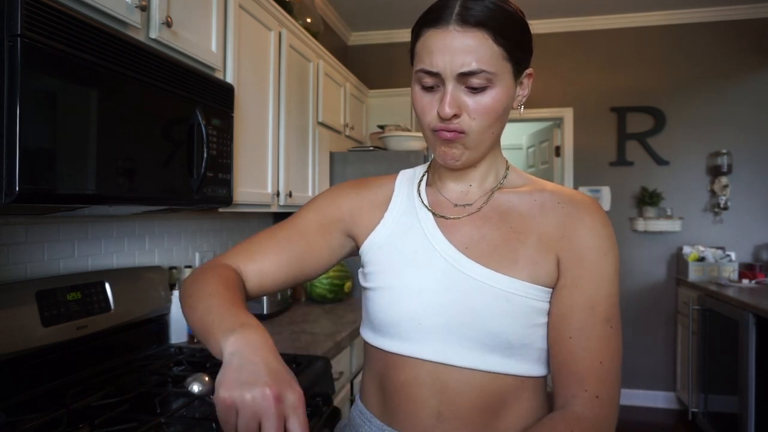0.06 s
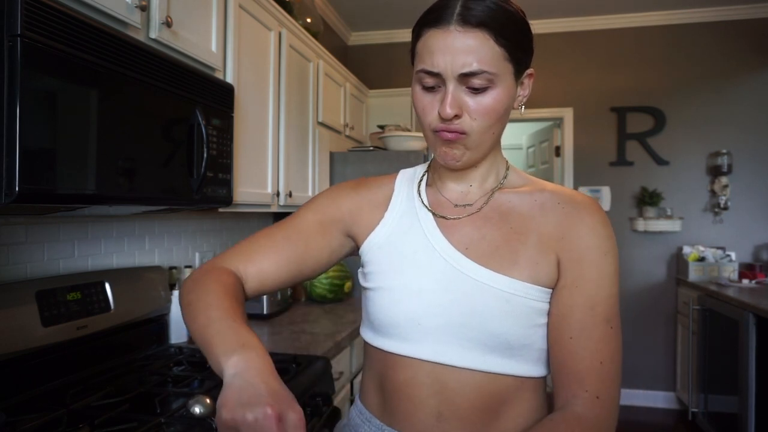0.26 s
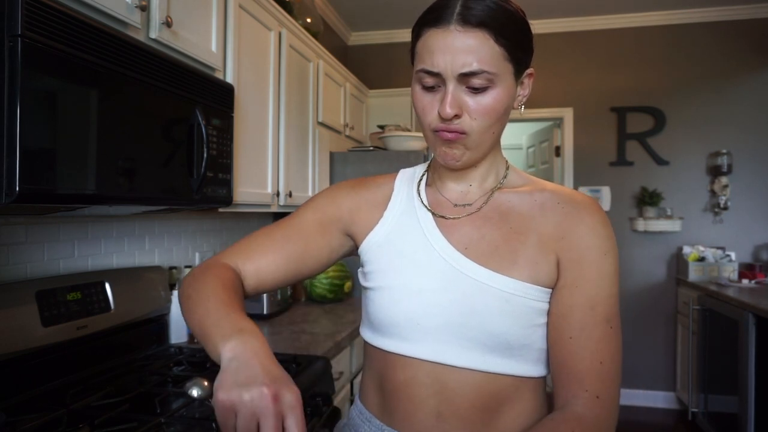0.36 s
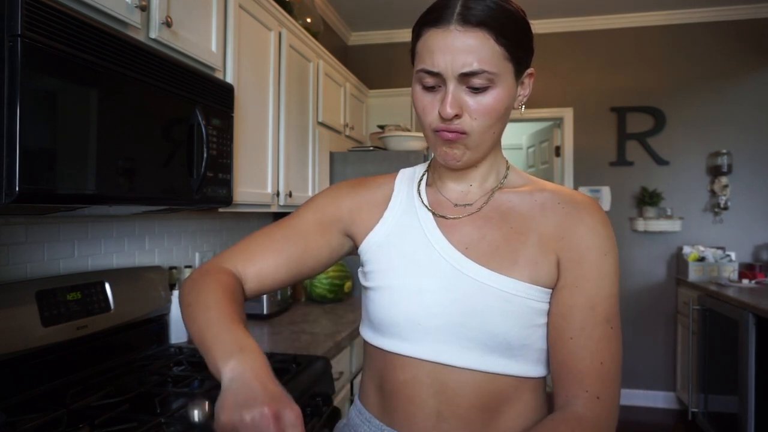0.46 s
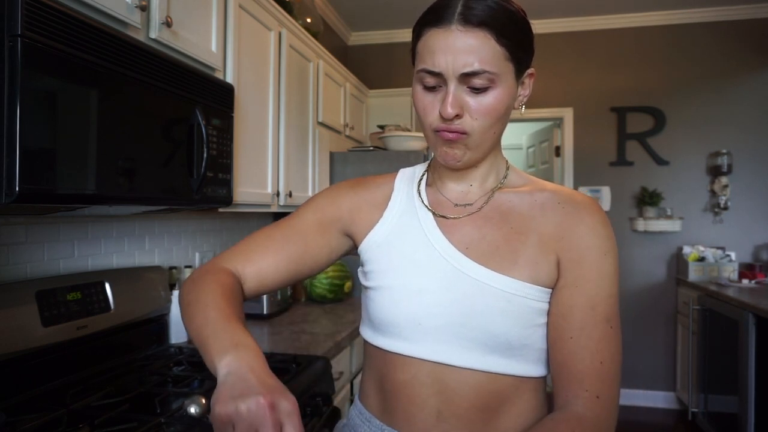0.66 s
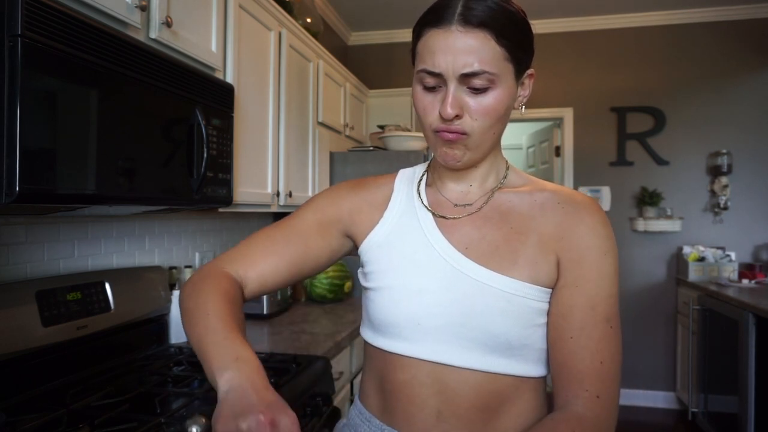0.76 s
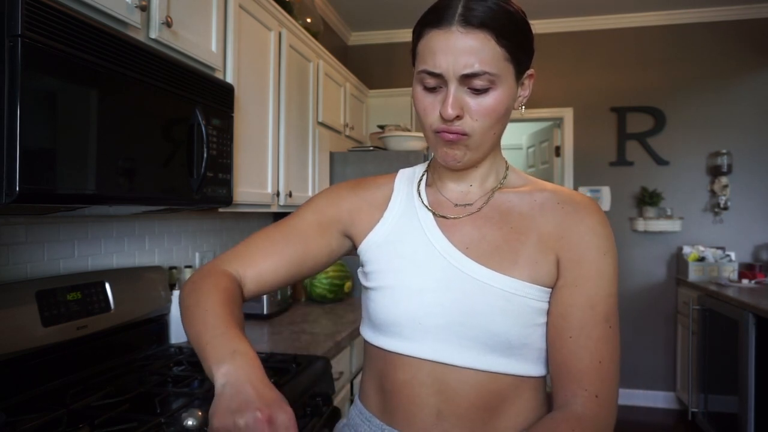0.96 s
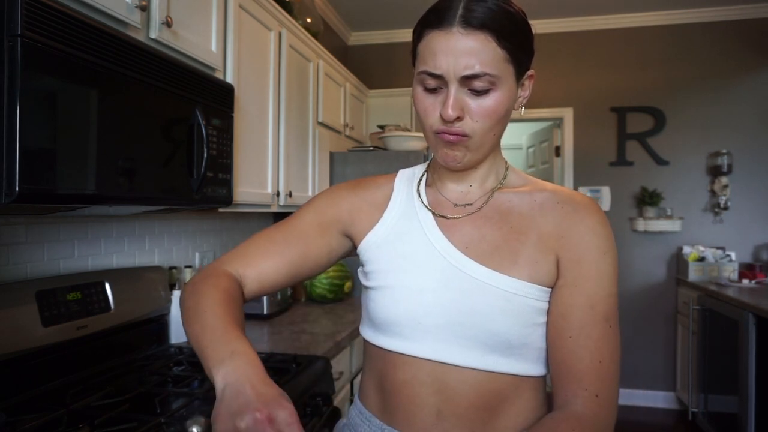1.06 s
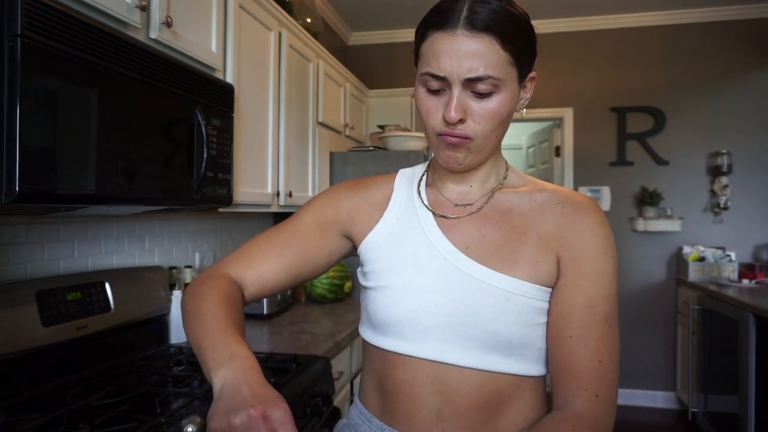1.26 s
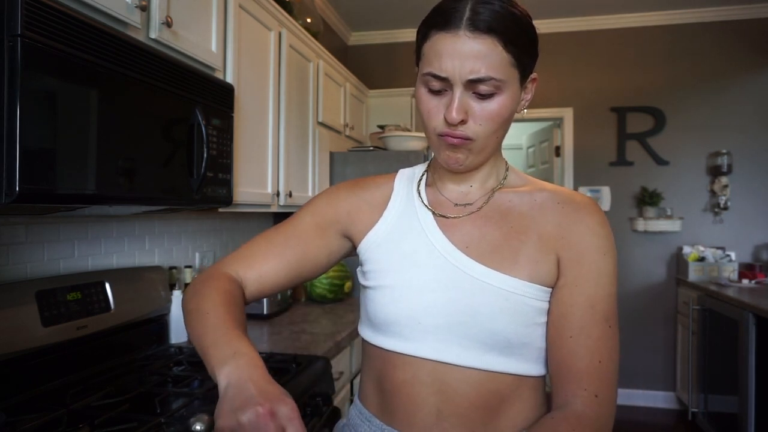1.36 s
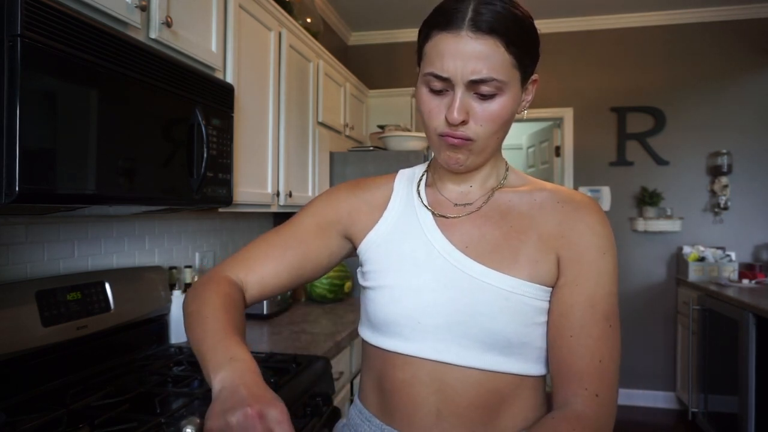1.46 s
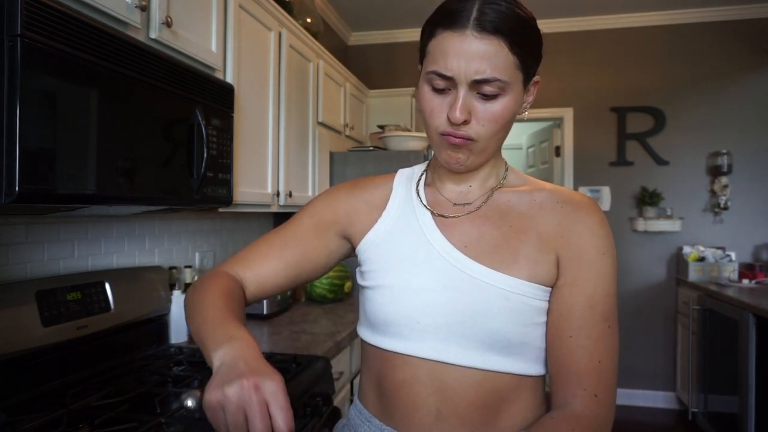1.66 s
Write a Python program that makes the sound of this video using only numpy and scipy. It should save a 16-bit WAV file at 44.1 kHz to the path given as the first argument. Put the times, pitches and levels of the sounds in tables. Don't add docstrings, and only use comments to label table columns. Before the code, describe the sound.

Ice and a metal spoon clatter in a full glass on a counter, in uneven bursts about a quarter second apart, quickening around one second, then thinning out; close microphone, lively kitchen echo, very quiet background.

```python
import sys
import numpy as np
from scipy import signal
from scipy.fft import rfft, irfft, next_fast_len
from scipy.io import wavfile

SR = 44100
rng = np.random.default_rng(int(sys.argv[2]) if len(sys.argv) > 2 else 0)


def elevation(decibels):
    levels = np.asarray(decibels, float)
    return 10 ** (levels / 20)


def store_wav(level_fs):
    pcm = np.round(np.clip(np.atleast_2d(level_fs), -1, 1) * 32767)
    wavfile.write(sys.argv[1], SR, pcm.T.astype(np.int16))


N = 74970


def read(points, hz):
    point_hz, value = np.transpose(points)
    return np.interp(np.log(hz + 1), np.log(point_hz + 1), value)


def add(mix, start_s, sound):
    part = mix[max(round(start_s * SR), 0):][:len(sound)]
    part += sound[:len(part)]


def butter(x, order, cut_hz, kind="low"):
    return signal.sosfilt(signal.butter(order, cut_hz, kind, fs=SR, output="sos"), x)


def ring(modes, rise_s, scale=1, spread=0):
    hz, db, t60_s = np.transpose(modes)[:, :, None]
    t = np.arange(round(t60_s.max() * SR) + 600) / SR
    hz = hz * scale * (1 + spread * rng.uniform(-1.15, 1, hz.shape))
    sines = elevation(db - 60 * t / t60_s) * np.sin(2 * np.pi * hz * t)
    return sines.sum(0) * (1 - np.exp(-t / rise_s))


def tick():
    decay_s, rise_s = 0.0029, 0.0014
    low_cut_hz, top_hz = 4100, 8600
    t = np.arange(600) / SR
    crack = rng.standard_normal(600) * np.exp(-t / decay_s) * (1 - np.exp(-t / rise_s))
    return butter(butter(crack, 1, top_hz), 2, low_cut_hz, "high")


def diffuse_pair(count, hz):
    # (frequency [Hz], share [0-1])
    likeness = [(350, .995), (700, .93), (1000, .8), (2000, .6), (4000, .2), (12000, .3)]
    a, b, c, d = rng.standard_normal((count, len(hz), 4)).T
    same = np.clip(read(likeness, hz), 0, 1)[:, None]
    left = a + 1j * b
    right = same * left + np.sqrt(1 - same ** 2) * (c + 1j * d)
    return np.array([left, right])


def hush():
    # (frequency [Hz], density [dB per Hz])
    air_spectrum = [(24, -59), (40, -33), (103, 25.5), (449, 9.5), (903, -2), (2450, 2), (5440, -14),
                    (6640, -16), (15500, -22.5)]
    hush_db, low_cut_hz = -54, 267
    earlier_db, earlier_t60_s = -51.5, 0.18
    hz = np.fft.rfftfreq(1024, 1 / SR)
    spectra = diffuse_pair(N // 256 + 5, hz) * elevation(read(air_spectrum, hz))[:, None]
    air = signal.istft(spectra, nperseg=1024, noverlap=768)[1][:, :N]
    air = butter(air, 4, low_cut_hz, "high")
    earlier = elevation(earlier_db - 60 * np.arange(N) / SR / earlier_t60_s)
    return (elevation(hush_db) + earlier) * air / air.std()


def counter_hum():
    counter_hz = [215, 282, 413, 484, 592, 655, 871, 1055]
    # (level [dB], t60 [s])
    counter_decay = [(-11, 0.053), (-11.5, 0.099), (-10.5, 0.2), (-34, 0.21), (-12.5, 0.081), (-26.5, 0.13),
                     (-28, 0.42), (-15, 0.12)]
    return ring(np.c_[counter_hz, counter_decay], 0.0022)


def rattle():
    # (start [s], length [s], level [dB], rate [clicks per s])
    clumps = [(0.216, 0.024, -46, 780), (0.501, 0.034, -42, 620), (0.735, 0.028, -39, 840),
              (1.328, 0.053, -49.5, 370)]
    # (multiple of pitch, level [dB], t60 [s])
    click_modes = [(1, 16, 0.0032), (1.45, 0.5, 0.019), (2.1, -26, 0.011), (3.3, 5, 0.00073)]
    # (lowest [Hz], highest [Hz])
    low_hz, high_hz = (1280, 3330)
    out = np.zeros(N)
    for start_s, length_s, db, per_s in clumps:
        clicks = rng.random((40, 3))[:round(per_s * length_s)]
        for when, pitch, smallness in clicks:
            hz = low_hz * (high_hz / low_hz) ** pitch
            click = ring(click_modes, 0.000069, hz)
            add(out, start_s + when * length_s, elevation(db - 5.4 * smallness) * click)
    return out


def glass():
    # (time [s], level [dB])
    wall_hits = [(1.1043, -14.5)]
    # (frequency [Hz], level [dB], t60 [s])
    wall_modes = [(1590, 4, .027), (2600, 0, .2), (3620, -12, .03), (1300, -3, .012)]
    # (frequency [Hz], level [dB], t60 [s])
    bell_modes = [(1052, -3, .11), (1105, -19, .4)]
    rise_s, bell_db, tick_db = .0012, 2.5, -5.5
    choke_s, choke_fade_s, choke_db = .0135, 0.00038, -17
    out = np.zeros(N)
    for start_s, db in wall_hits:
        wall = ring(wall_modes, rise_s)
        t = np.arange(len(wall)) / SR
        choke = np.clip((t - choke_s) / choke_fade_s, 0, 1)
        add(out, start_s, elevation(db + choke_db * choke) * wall)
        add(out, start_s, elevation(db + bell_db) * ring(bell_modes, rise_s))
        add(out, start_s, elevation(db + tick_db) * tick())
    return out


def ice():
    # (time [s], level [dB], pitch [Hz], weight felt by the counter [dB])
    thuds = [(.0095, -41, 570, -32), (0.013, -28, 673, -5), (0.051, -32.5, 570, 0),
             (0.202, -24.5, 400, 0.5), (0.214, -13, 533, -6.5), (0.2184, -6.5, 622, -6.5),
             (0.234, -27.5, 660, 12), (0.2469, -9, 615, -8), (.264, -25, 506, 5.5), (0.504, -11.5, 499, -1),
             (0.5074, -13.5, 690, -9.5), (.514, -11.5, 518, -12), (.525, -17, 690, -9),
             (0.542, -19, 480, -11), (.562, -15.5, 607, -8), (.5662, -13.5, 636, -7), (0.7377, -18, 585, 7),
             (.7418, -14.5, 670, -16), (.753, -18, 557, -6.5), (.759, -22.5, 550, -18),
             (.7785, -16, 638, -15.5), (0.9555, -19, 696, -7.5), (.9572, -10, 653, -25),
             (.9602, -10, 652, -22.5), (.9655, -23.5, 660, -11), (.98, -22, 635, -28),
             (0.7648, -26.5, 620, 1), (1.0446, -19.5, 464, -2), (1.058, -22, 620, -4), (1.079, -24, 560, 2),
             (1.3796, -16.5, 654, -7), (1.486, -28, 396, -6), (1.512, -40, 373, 1), (1.534, -45, 340, -32),
             (.0325, -39, 710, -6), (.533, -24, 555, -25)]
    # (multiple of pitch, level [dB], t60 [s])
    thud_modes = [(1, 8.5, 0.0079), (1.4, -48, 0.022), (1.9, -10, 0.021), (3.9, -6, 0.0047)]
    out, hum = np.zeros(N), counter_hum()
    for start_s, db, hz, weight_db in thuds:
        add(out, start_s, elevation(db) * ring(thud_modes, 0.00083, hz, .008))
        add(out, start_s, elevation(db + weight_db) * hum)
    return out


def spoon():
    # (time [s], level [dB], pitch [Hz], tick [dB], t60 [s])
    clinks = [(.0087, -32.5, 2890, -50, 0.0098), (0.0483, -26, 3050, -12.5, 0.0082),
              (.0605, -37, 2480, -12, 0.011), (0.2428, -37.5, 5700, -40, 0.021),
              (0.242, -23.5, 2990, -43, 0.017), (0.288, -31.5, 2284, -40, 0.084),
              (.5615, -26, 3040, -46, 0.02), (0.568, -46, 4583, -40, 0.15), (.498, -24, 2770, -21, 0.0068),
              (0.519, -24, 2610, -25, 0.013), (.226, -29.5, 3070, -5, 0.01), (0.234, -27, 2600, -24, 0.014),
              (0.054, -31, 2470, -18, 0.017), (0.203, -33, 2440, -8, 0.014),
              (0.2418, -7.5, 2290, -15, 0.01), (0.4951, -16, 2250, -26.5, 0.0056),
              (0.5103, -26.5, 1398, -8.5, 0.045), (.858, -29, 2320, -40, 0.09),
              (0.5618, -5, 2263, -14.5, 0.011), (0.7368, -33, 2340, -9, 0.0098),
              (.783, -26, 2350, -49, 0.025), (.7925, -22, 2250, -34, 0.025),
              (.2505, -19.5, 2220, -30, .015), (.263, -35, 2370, -30, 0.028),
              (0.7479, -22, 1330, -15, 0.016), (0.774, -7.5, 2312, -13, 0.012),
              (0.954, -6.5, 2230, -10.5, 0.015), (.9632, -19, 2340, -14, 0.034),
                   (1.036, -30, 2070, -28, 0.02), (1.0535, -24.5, 2175, -11, 0.022),
                   (1.0540, -21, 3500, -6, 0.015), (1.0586, -19.5, 2516, -11, 0.019),
                   (1.066, -19, 2750, -10, .015), (1.0785, -27, 2530, -9, 0.012),
                   (1.0775, -23, 2076, -20, 0.022), (1.079, -14, 2650, -26, 0.022),
                   (1.1318, -8.5, 1870, -18.5, 0.0081), (1.1307, -25, 3610, -10, 0.032),
                   (1.136, -21, 2150, -12, 0.016), (1.139, -25, 2750, -27, 0.023),
                   (1.1398, -21.5, 2530, -23, 0.035), (1.165, -27.5, 1220, -43, 0.045),
                   (1.193, -60, 1620, -11, 0.065), (1.3788, -12, 2281, -10.5, 0.026),
                   (1.390, -16.5, 2249, -11.5, 0.028), (1.4265, -30.5, 2251, -31, 0.085),
                   (0.81, -34, 2302, -48, 0.26)]
    # (multiple of pitch, level [dB], share of the clink's t60)
    clink_modes = [(1, 6.5, 0.56), (.99, -22.5, 2.6), (1.13, -10, 0.98), (1.37, -16, 1.56),
                   (.78, 0.5, 0.15), (2.03, -18.5, 1.05), (1.7, -8.5, 0.31)]
    # (frequency [Hz], level [dB], t60 [s])
    spoon_modes = [(5800, -7, .007), (8500, -10, .007), (10300, -7, .008)]
    out = np.zeros(N)
    for start_s, db, hz, tick_db, t60_s in clinks:
        clink = ring(np.multiply(clink_modes, [hz, 1, t60_s]), 0.00063)
        add(out, start_s, elevation(db) * clink)
        add(out, start_s, elevation(db + tick_db) * ring(spoon_modes, .0002, 1, .04))
        add(out, start_s, elevation(db + tick_db) * tick())
    return out


def direct_and_echoes(near):
    # (delay [s], left [dB], right [dB])
    echoes = [(.0021, -69, -60), (.0044, -11.5, -3), (.0088, -6, -10), (.0125, -11.5, -15.5),
              (0.0222, -12, -10), (.046, -14, -12.5)]
    top_hz, low_hz, pan_db = 4380, 980, 0.54
    taps = np.zeros((2, SR // 10))
    for k, (delay_s, left_db, right_db) in enumerate(echoes):
        taps[0, round(delay_s * SR)] = elevation(left_db)
        taps[1, round(delay_s * SR) + k % 3] = elevation(right_db)
    taps = butter(taps, 2, top_hz)
    taps = taps - 0.59 * butter(taps, 1, low_hz)
    taps[:, 0] = elevation(pan_db), elevation(-pan_db)
    return signal.fftconvolve(near[None], taps, axes=1)[:, :N]


def tails(far):
    # (frequency [Hz], t60 [s])
    decay_t60 = [(170, 1), (400, 0.5), (1000, 0.81), (2300, 0.55), (5000, 0.58), (10000, 0.35),
                 (15000, 0.38)]
    # (frequency [Hz], level [dB])
    colour = [(200, 0.5), (600, -3.5), (1500, 2.5), (3000, 0.5), (6000, 8), (12000, 5.5)]
    tail_db, low_cut_hz, turns_per_s = 0.68, 105, 3.7
    build_s, treble_build_s, treble_hz = .013, 0.001, 4380
    hz = np.fft.rfftfreq(128, 1 / SR)[:, None]
    t = np.arange(1000) * 32 / SR
    build = np.clip(t / np.where(hz > treble_hz, treble_build_s, build_s), 0, 1) ** 2
    shape = build * elevation(read(colour, hz) - 60 * t / read(decay_t60, hz))
    far = butter(far, 4, low_cut_hz, "high")
    out = np.zeros((2, N))
    for k in range(3):
        spectra = diffuse_pair(1000, hz[:, 0]) * shape
        tail = signal.istft(spectra, nperseg=128, noverlap=96)[1]
        tail = tail / np.linalg.norm(tail[0])
        share = np.sqrt(2 / 3) * np.cos(2 * np.pi * (np.arange(N) / SR * turns_per_s + k / 3))
        out += elevation(tail_db) * signal.fftconvolve((far * share)[None], tail, axes=1)[:, :N]
    return out


def scene():
    wall_wet_db = -7
    air = hush()
    wall = glass()
    drink = rattle() + ice() + spoon()
    return direct_and_echoes(drink + wall) + tails(drink + elevation(wall_wet_db) * wall) + air


def roll_off(x):
    return signal.sosfilt(signal.butter(12, 16800, fs=SR, output="sos"), x)


def record(dry):
    left_lead_s, lead_top_hz, top_hz = .00004, 5500, 15750
    low_cut_hz, bass_leak_db = 199.7, -21.5
    length = next_fast_len(N + 4096)
    hz = np.fft.rfftfreq(length, 1 / SR)
    delay_s = left_lead_s * np.array([[.5], [-.5]])
    response = np.exp(2j * np.pi * np.minimum(hz, lead_top_hz) * delay_s)
    response = response * elevation(-30 * np.clip((hz - top_hz) / 300, 0, 1))
    ports = irfft(rfft(dry, length) * response, length)[:, :N]
    mix = butter(ports, 4, low_cut_hz, "high") + elevation(bass_leak_db) * ports
    return roll_off(mix)


dry = scene()
out = record(dry)
store_wav(out)
```